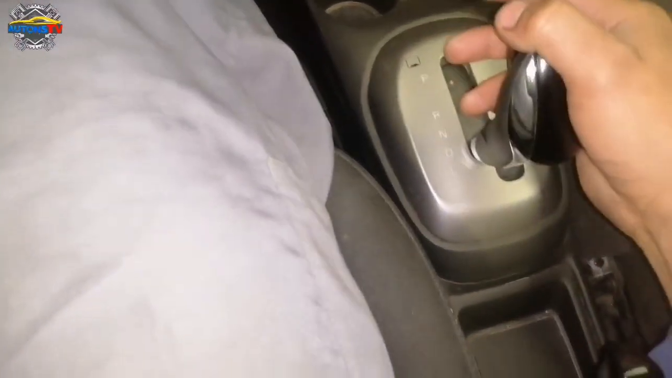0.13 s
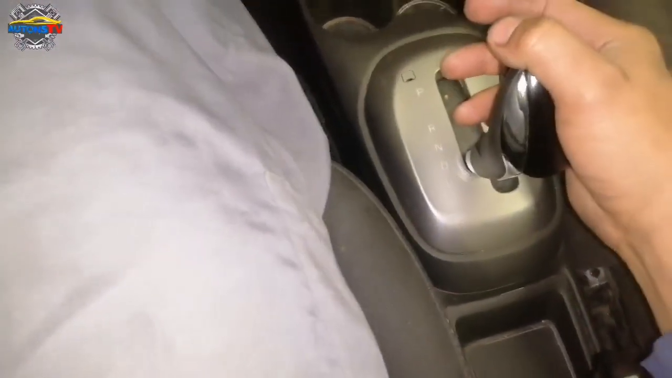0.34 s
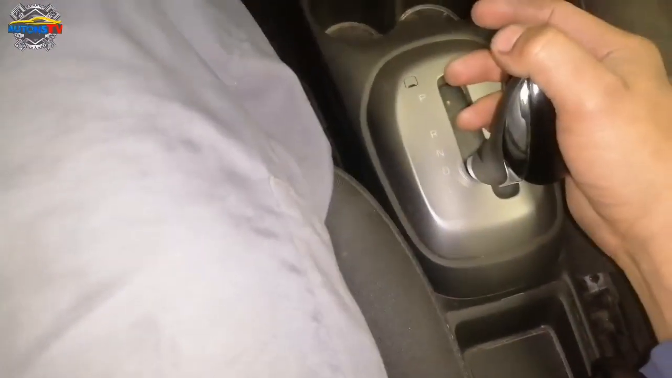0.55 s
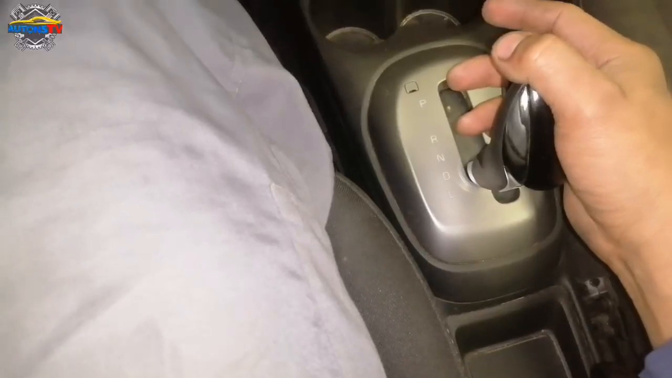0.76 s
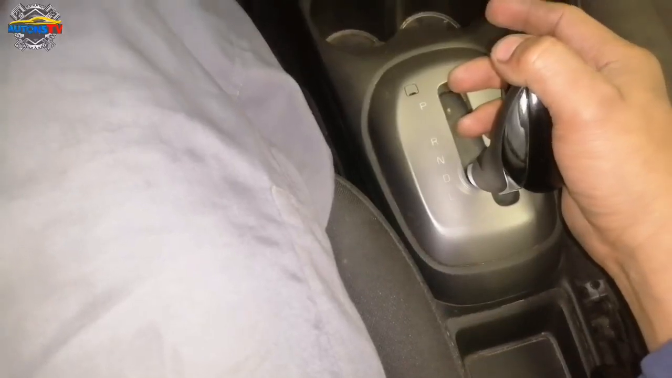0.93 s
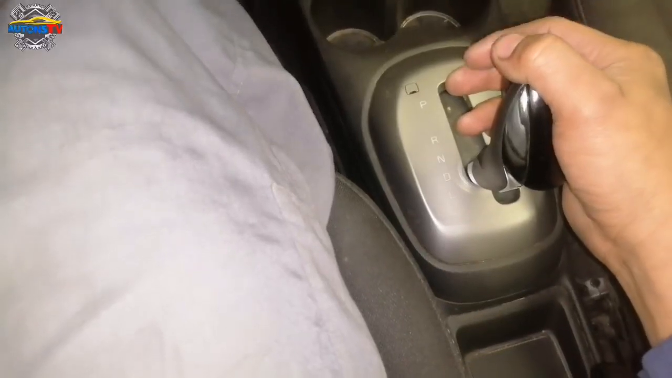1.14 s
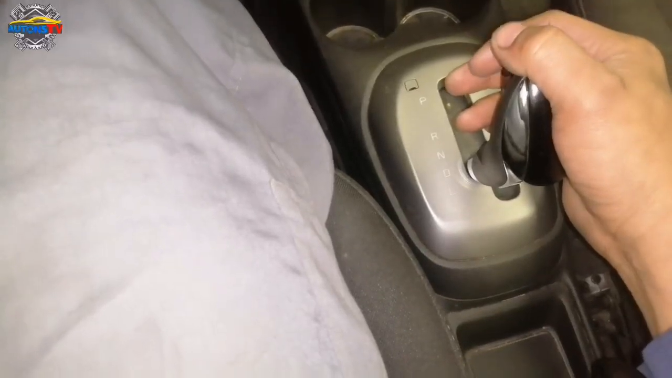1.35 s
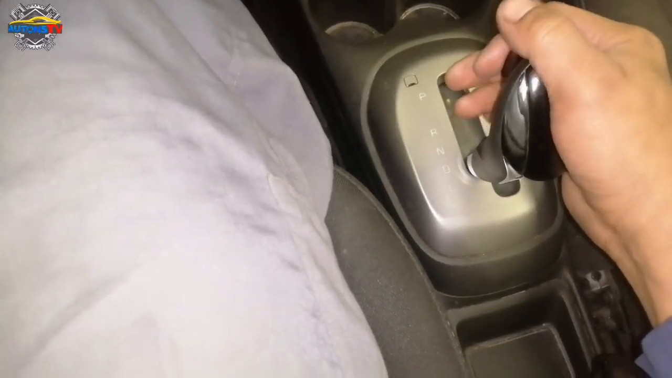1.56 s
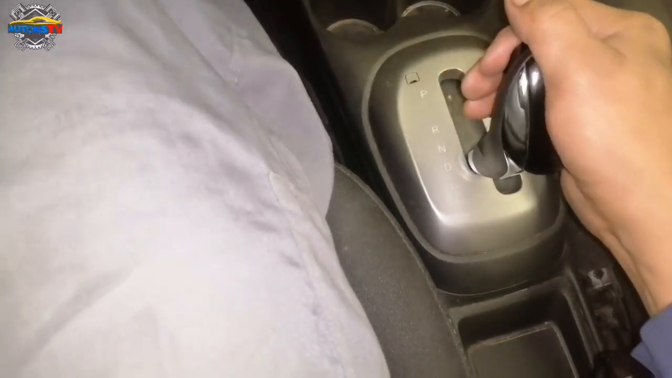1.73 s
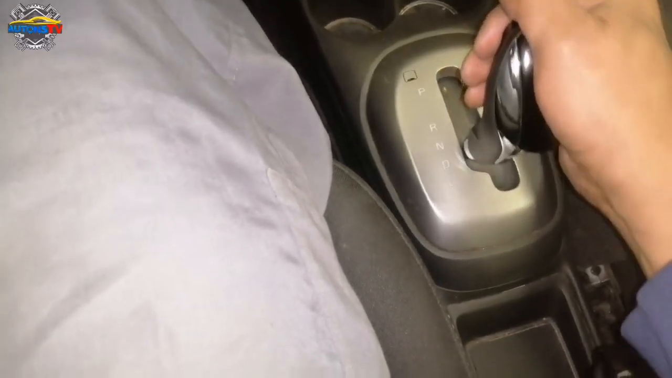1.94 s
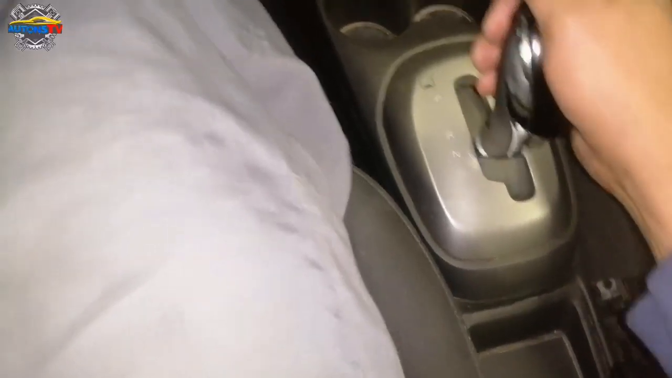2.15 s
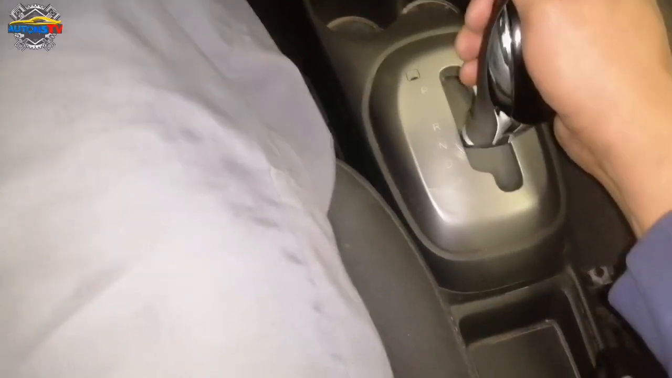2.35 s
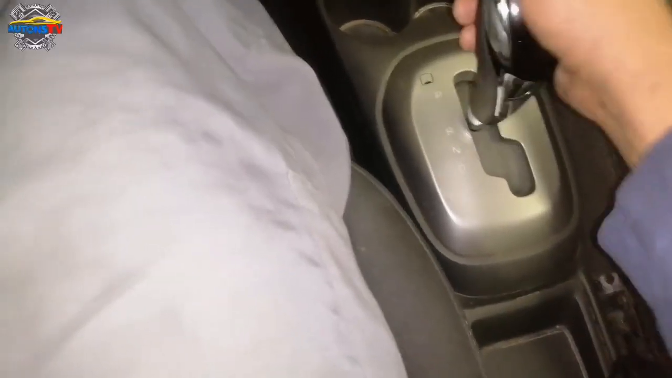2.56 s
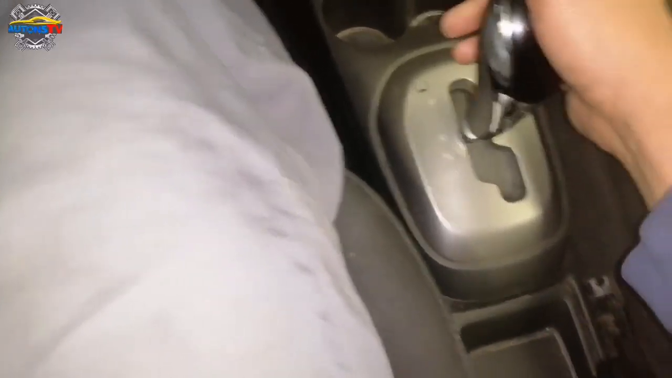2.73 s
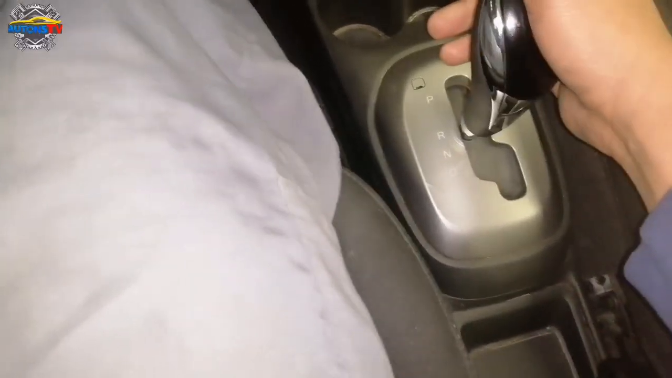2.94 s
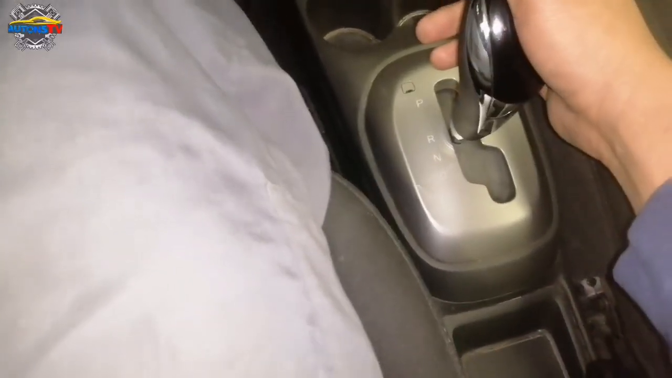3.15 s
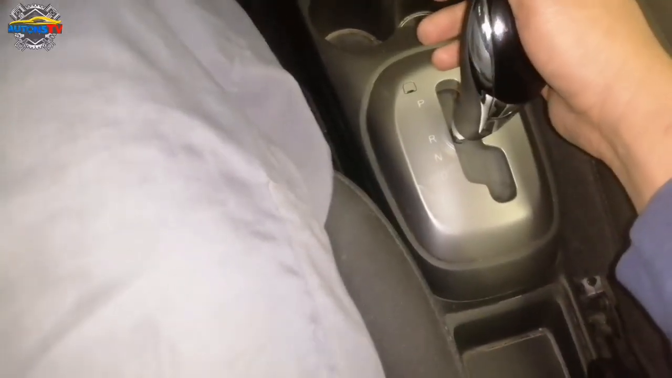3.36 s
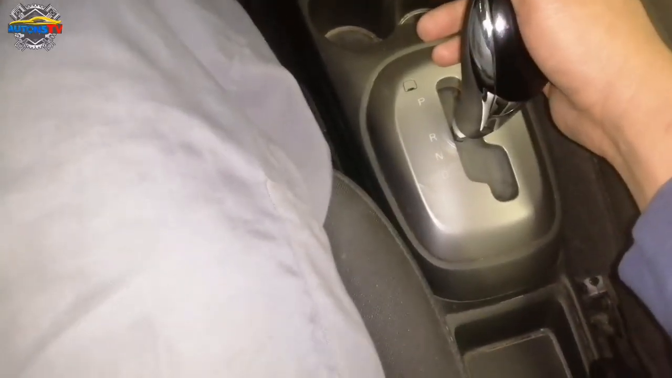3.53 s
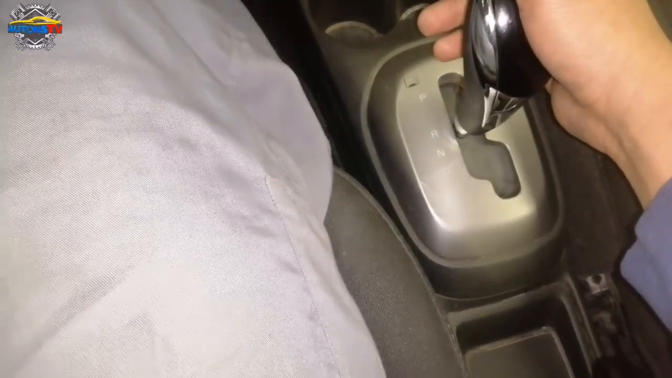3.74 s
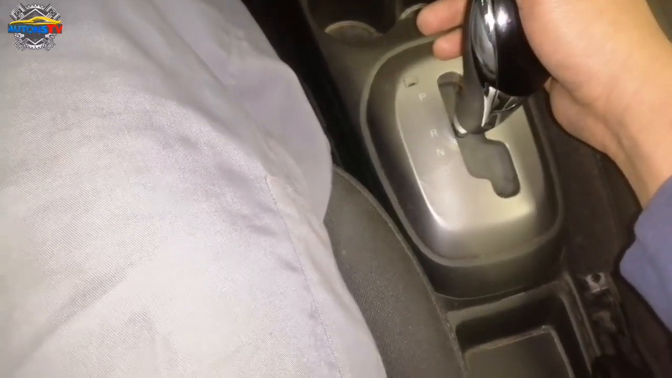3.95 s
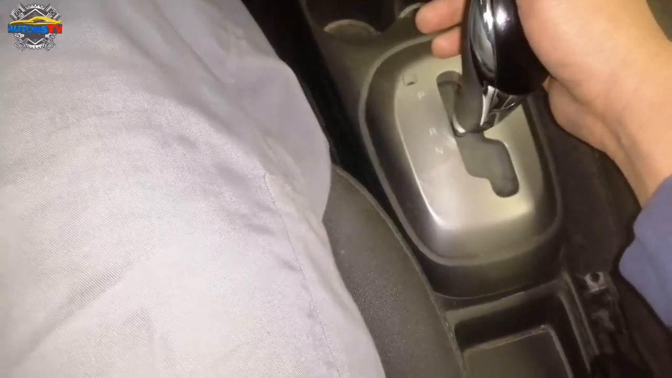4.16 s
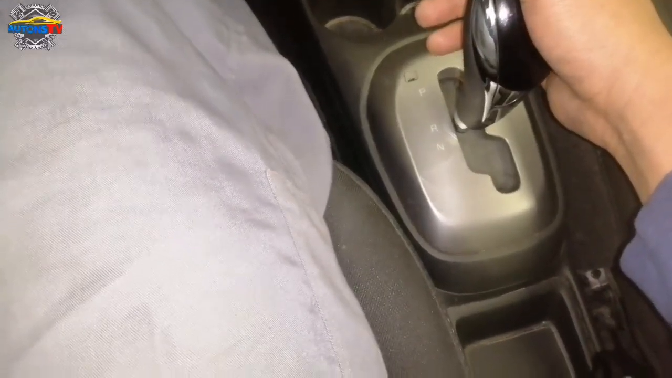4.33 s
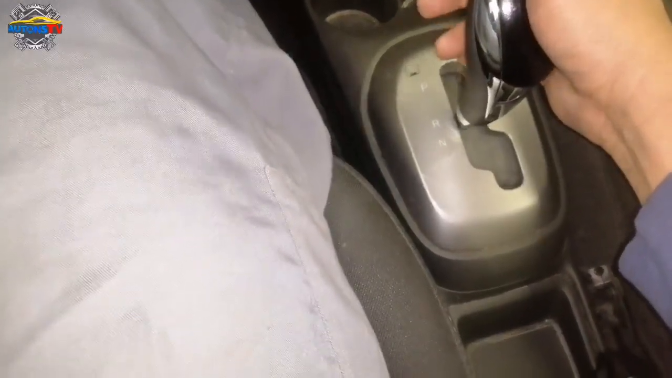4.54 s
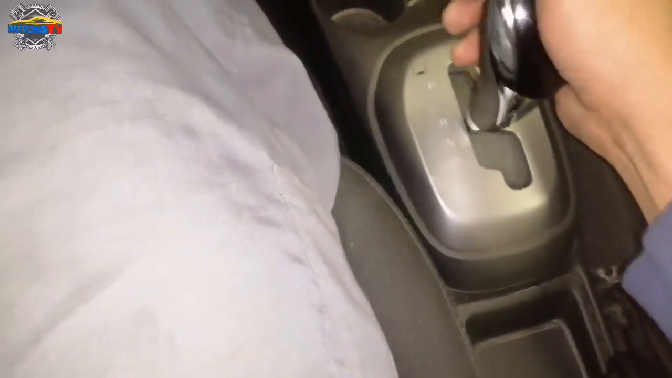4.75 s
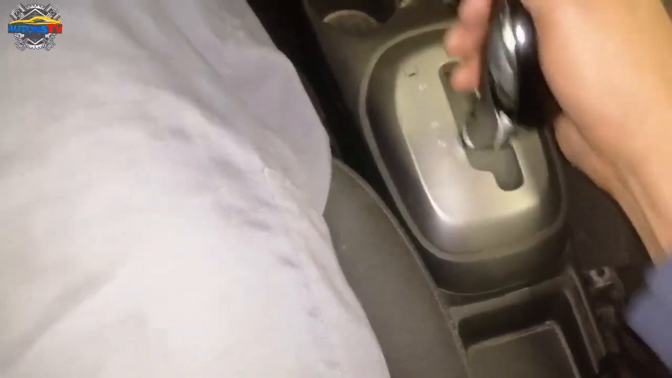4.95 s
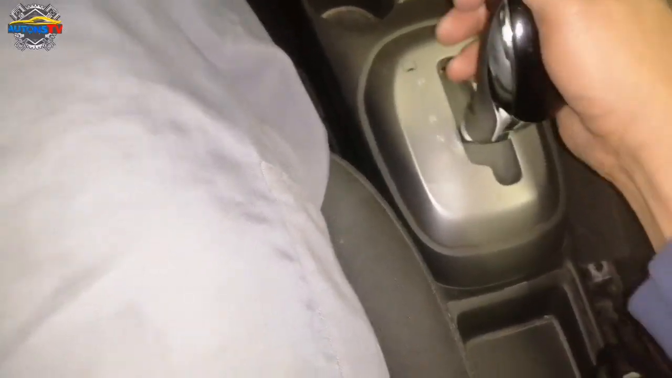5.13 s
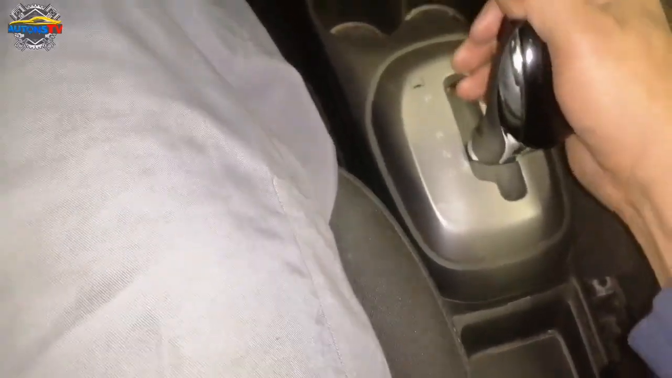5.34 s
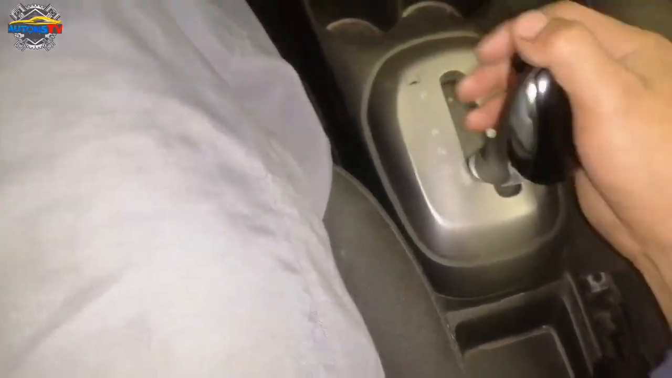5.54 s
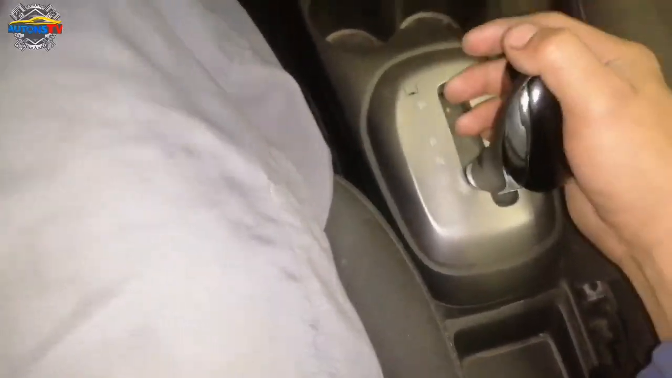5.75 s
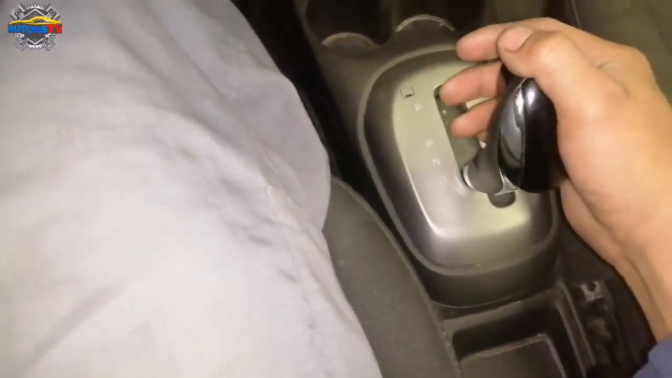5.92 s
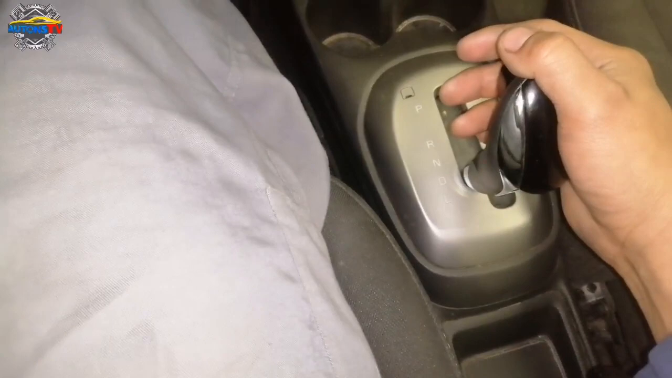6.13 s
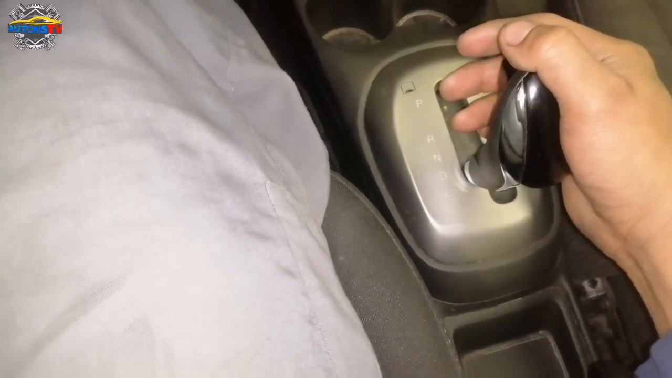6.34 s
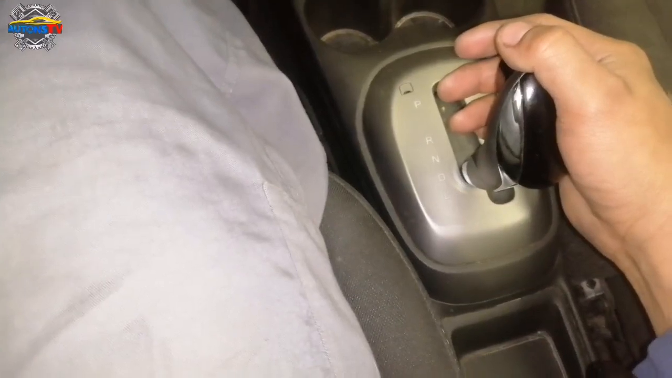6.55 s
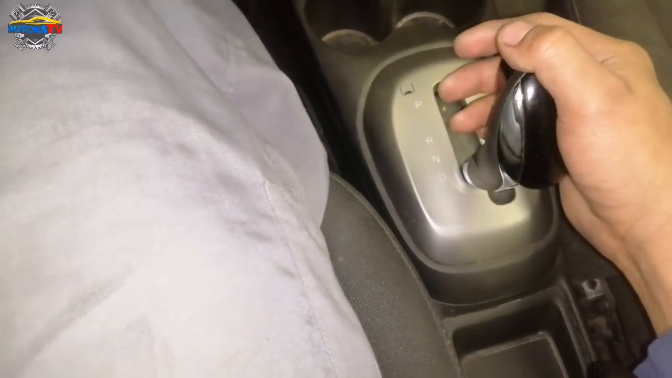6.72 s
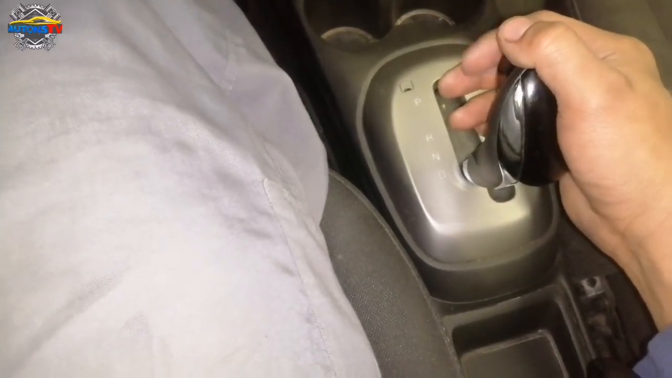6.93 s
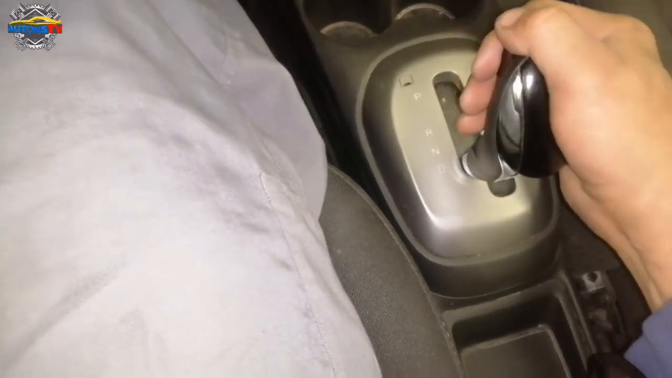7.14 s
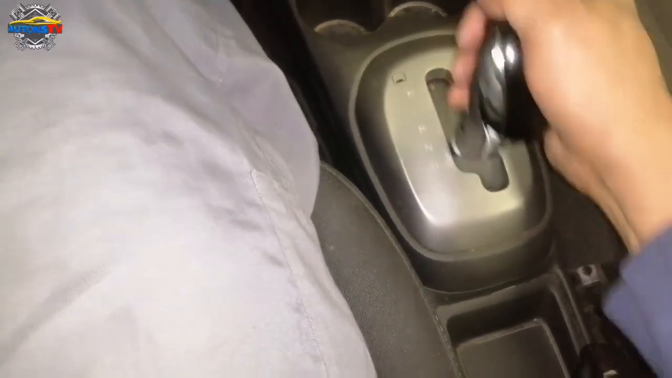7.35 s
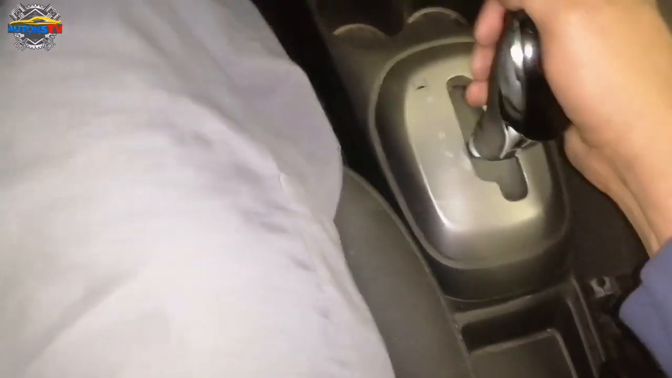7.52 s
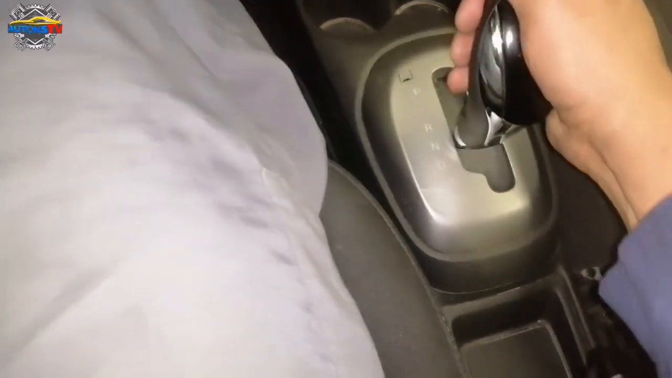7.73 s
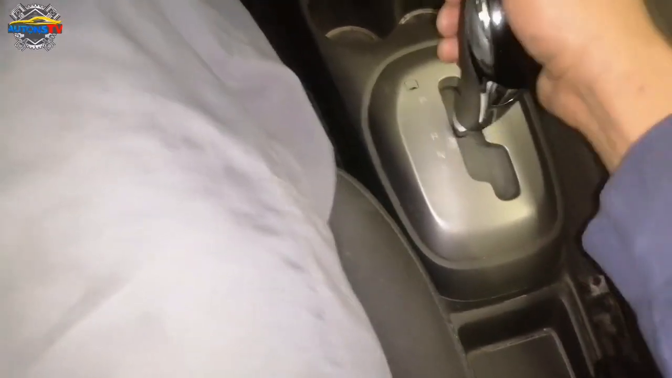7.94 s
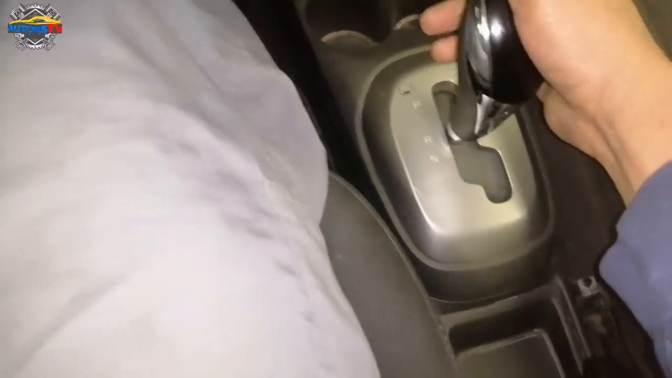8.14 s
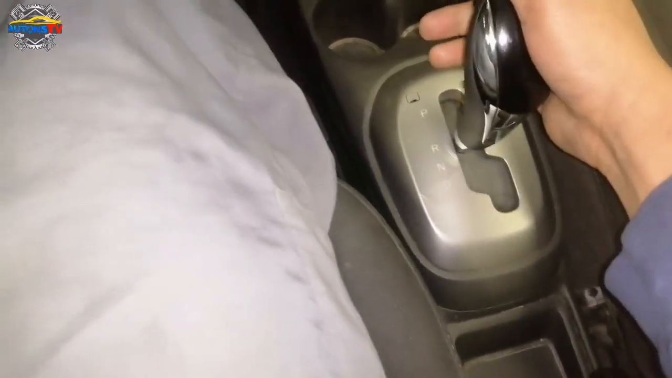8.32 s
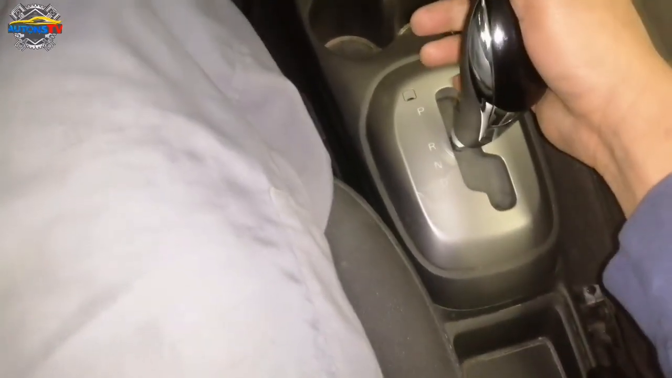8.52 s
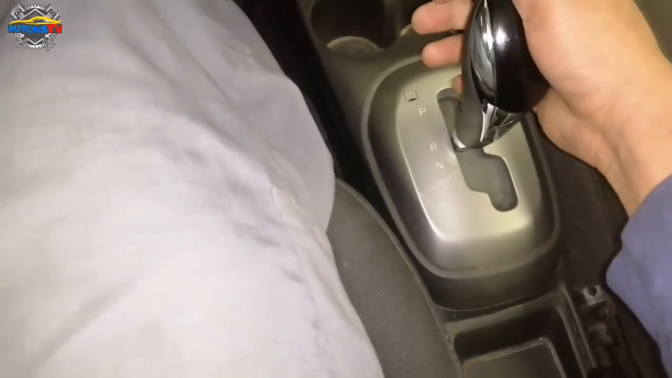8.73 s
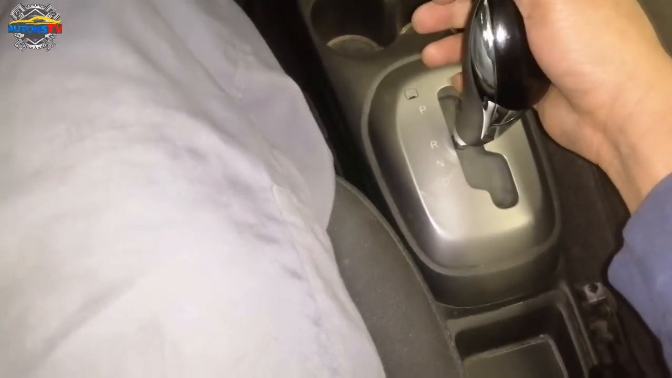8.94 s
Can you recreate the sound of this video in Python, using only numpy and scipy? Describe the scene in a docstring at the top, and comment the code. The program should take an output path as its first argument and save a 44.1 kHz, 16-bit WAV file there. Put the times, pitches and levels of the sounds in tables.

```python
"""Inside an idling car, a hand moves the automatic gear lever between drive and reverse.
The lever thuds into its notches, its plastic parts tick and rub, and its lock button snaps back.
The engine speeds up a little between gears, then hums and shakes the car as it pulls against one.
Gearbox shafts whine faintly, and air hisses through the brake booster as the pedal moves."""
import sys
import numpy as np
from scipy import signal
from scipy.fft import rfft, irfft, next_fast_len
from scipy.io import wavfile
from scipy.ndimage import map_coordinates

SR = 44100
rng = np.random.default_rng(int(sys.argv[2]) if len(sys.argv) > 2 else 0)


def digitize_waveform(pressure):
    """Quantize a signal to 16-bit integers and store it at the path in sys.argv[1].

    Rows of a 2-D input are taken as channels; values are limited to [-1, 1].
    """
    field = np.atleast_2d(pressure).T
    bounded = np.clip(field, -1, 1)
    quanta = np.round(bounded * 32767).astype(np.int16)
    wavfile.write(sys.argv[1], SR, quanta)


N = 400428

# Levels are relative, before each sound's own gain. ring_s is the time to fade by 60 dB.
# the lever lands in a notch: start_s, level_db, boom_db, knock_db, pitch_hz
LEVER_THUDS = [(0.058, -18, -13.5, -6.5, 255), (0.07, -37, -9, 5, 275), (2.135, -10, -9, -11, 277.5),
               (2.249, -32, -26, -15, 279), (2.448, -33.5, -9, -10.5, 265), (2.599, -11, -8, -8.5, 280.7),
               (2.684, -31.5, 5.5, -27.5, 296), (5.04, -15.5, -9, -12, 274.4),
               (5.076, -23.5, -9, -10.5, 271), (5.174, -27.5, -18, -17, 273), (5.56, -18, -8, -7.5, 260.5),
               (5.597, -29.5, -0.5, -15, 270), (5.619, -26.5, -6, -37, 276), (7.499, -11, -8, -13, 283),
               (7.602, -30.5, 0.5, -8, 277), (7.832, -31, -29, -15, 273), (7.994, -11.5, -6.5, -9.5, 281),
               (8.064, -29, -9, -16.5, 270), (8.136, -32, -3, -16, 275)]
# the lever's own tones: pitch_multiple, level_db, ring_s
LEVER_TONES = [(.9, -25, 0.047), (1, 1.4, 0.096), (1.091, -6.5, 0.09)]
# tones of the console panel and cabin air: pitch_hz, level_db, ring_s
CONSOLE_TONES = [(125.3, -1.5, 0.23), (184, -6, 0.1204), (341.3, -1.5, 0.15), (378, -0.5, 0.18),
                 (459, -6.5, 0.097), (490.5, -8.5, 0.062), (548.2, -6.5, 0.14), (834, -14.5, 0.18),
                 (1153, -19.5, 0.14)]
# trim shaken by a thud: pitch_hz, level_db
KNOCK_SPECTRUM = [(60, -9.5), (130, -11), (200, -27.5), (420, 0), (800, -10.5), (1500, -20), (4000, -55.5)]
# how long trim rings, before each clatter stretches it: pitch_hz, ring_s
TRIM_RING_TIMES = [(300, 0.092), (1200, 0.096), (4000, 0.079), (12000, 0.079)]
# the lock button springs out and bounces: start_s, level_db
BUTTON_SNAPS = [(2.7976, -14), (2.816, -19), (8.1850, -12.5), (8.2043, -20)]
# tones of the knob: pitch_hz, level_db, ring_s
KNOB_TONES = [(278, -3, 0.088), (347, -4.5, 0.069), (756, -21, 0.064), (914, -14, 0.09), (1020, -16, 0.086),
              (1380, -19.5, 0.11), (1685, -17, 0.067), (2355, -14, .075), (2713, -19.5, 0.046),
              (3245, -20, .075), (3530, -12.5, 0.0591), (3760, -8.5, 0.058), (3835, -14, 0.066),
              (4170, -11.5, 0.048), (4380, -11.5, 0.05), (5020, -22, 0.058), (5520, -22, .065),
              (5630, -15.5, 0.0551), (7240, -23, .06)]
# the button's crack and its bright edge: pitch_hz, level_db
CRACK_SPECTRUM = [(88, -44), (150, -20), (286, 2), (448, -12.5), (871, -8.5), (1390, -15), (1900, -20),
                  (2400, -17), (2600, -13.5), (3770, -17), (5570, -13.5), (6260, -25.5), (10000, -30.5),
                  (14200, -57.5), (16000, -69)]
EDGE_SPECTRUM = [(1000, -28.5), (4500, 7.5), (9500, -2), (15000, -28.5)]
# the lever's links touch: start_s, level_db, clack_db, edge_db
LINK_TICKS = [(0.054, -29.5, 0.5, -18.5), (1.5783, -55, -7, -12.5), (1.7165, -54, 3, -18),
              (1.8977, -49, -16, -8), (2.134, -32, -12, -18.5), (2.1507, -36, 2, -26),
              (2.2464, -46, 1, -16), (2.439, -49.5, 4.5, -23), (2.597, -35, 3, -11.5), (2.615, -32, 2, -28),
              (2.6822, -35.5, 10, -27), (2.7373, -52, 2, -17), (5.037, -32, 1.5, -21),
              (5.0453, -28.5, -15, -27), (5.0716, -41.5, 2, -15), (5.1547, -43.5, 4, -22),
              (5.3285, -57, -1.5, -27), (5.5583, -32, 3, -18), (5.6113, -57, 8, -2), (7.105, -58, -7, -9),
              (7.19, -56.5, -1, -8), (7.4306, -46.5, -11, -10.5), (7.5009, -30.5, 6.5, -26),
              (7.5151, -37, 3, -21), (7.6014, -42.5, -3, -17), (7.8268, -52.5, 3.5, -15),
              (7.9903, -33.5, -6, -15.5), (8.014, -33.5, -8, -29), (8.0614, -29.5, 3, -22),
              (8.1324, -40.5, -4, -17.5)]
# struck plastic: pitch_hz, level_db
PLASTIC_SPECTRUM = [(300, -20), (500, -1.5), (680, -24), (850, -3.5), (1200, -13), (1420, -6), (1750, -14),
                    (2380, -17), (2600, -19), (2880, -16.5), (3400, -23.5), (4400, -25), (7700, -29.5),
                    (15000, -43.5)]
# resonances of the plastic housing: pitch_hz, width_hz, boost_db
HOUSING_PEAKS = [(1650, 60, 1.5), (2370, 87, 1), (2720, 34, 0.5), (3020, 66, 5.5), (3503, 41, 5),
                 (3940, 70, 7.5), (4470, 61, 4.5), (5600, 78, 11.5), (7500, 180, 5.5)]
# the lever taps its gate, the slotted plate that guides it: start_s, level_db
GATE_TAPS = [(0.0535, -24.5), (0.0946, -32.5), (2.683, -24.5), (5.1767, -50), (5.558, -26), (5.6146, -44.5),
             (8.0635, -22)]
# tones of that hollow plate: pitch_hz, level_db, ring_s
GATE_TONES = [(480, -5.5, 0.096), (900, -31, .06), (1048, -6.5, 0.053), (1267, 2.5, 0.029),
              (1363, 1, 0.046), (1610, -21, .04)]
# a spring in the links pings: start_s, level_db, pitch_hz, ring_s
SPRING_PINGS = [(1.7165, -53, 1850, 0.03), (7.107, -56.5, 3090, 0.043), (7.109, -57, 3200, 0.054)]
# the lever rubs along its gate: crest_s, rise_s, fall_s, groan_db, scrape_db
GATE_RUBS = [(.06, 0.043, 0.064, -38, -60.5), (2.135, 0.01, 0.035, -31.5, -53.5),
             (2.6, 0.022, .06, -30, -61), (2.795, 0.016, 0.017, -36.5, -69), (4.88, 0.094, 0.051, -49, -83),
             (5.13, 0.046, 0.11, -55, -74), (5.562, 0.026, 0.043, -43, -56.5), (7.5, .015, .03, -29, -51),
             (7.99, 0.083, 0.13, -40.5, -66.5), (8.18, .02, 0.055, -41.5, -69)]
# the groaning console and the scraped plastic: pitch_hz, level_db
GROAN_SPECTRUM = [(60, -22.5), (195, -19.5), (275, 6.5), (330, -3.5), (400, -8), (560, -15), (900, -16.5),
                  (1600, -30.5), (4000, -74)]
SCRAPE_SPECTRUM = [(400, -25.5), (1000, 0), (2800, 2.5), (5500, -8.5), (10000, -17.5), (15500, -29)]
# the freed engine speeds up between gears: crest_s, firing_hz
ENGINE_FLARES = [(.7, 25.52), (3.32, 25.71), (6.15, 25.45), (8.73, 25.8)]
# the car body booms when the firings reach its resonance: firing_hz, level_db
BODY_BOOM = [(22.3, -44), (23.2, -52), (24.2, -49.5), (25.5, -34.5)]
# the engine pulls against each gear: start_s, end_s, load_db
DRIVE_PULLS = [(1.0, 2.7, -55.5), (6.44, 8.0, -52)]
REVERSE_PULLS = [(0, 0.26, -46.5), (3.64, 5.5, -47.5), (8.96, 9.5, -46.5)]
# the engine's overtones in each gear: firing_multiple, level_db
DRIVE_TONES = [(2, 5.5), (3, 3), (4, -11.5), (5, 1.5), (6, -2.5), (7, -23.5), (9, -24)]
REVERSE_TONES = [(2, -3), (3, 1.5), (4, -0.5), (5, -7.5), (6, 1), (8, -12), (9, -14), (10, -20.5),
                 (11, -17.5), (13, -15)]
# engine noise in the cabin: pitch_hz, level_db
MURMUR_SPECTRUM = [(25, -2), (60, -2.5), (120, -7), (200, -8.5), (320, -12), (500, -17), (900, -25),
                   (1200, -27.5), (1700, -33), (4000, -38.5), (7500, -46), (8600, -52.5), (12000, -56.5),
                   (15500, -59.5)]
# resonances of the cabin: pitch_hz, width_hz, boost_db
CABIN_PEAKS = [(300.6, 27.8, 9), (689, 24, 8), (1098, 82, 4.5)]
# the car jolts as reverse grips: crest_s, level_db
REVERSE_JOLTS = [(3.72, -35), (9.05, -43)]
# the car body's rumble: pitch_hz, level_db
RUMBLE_SPECTRUM = [(30, -27), (65, -2), (90, -1.5), (135, -3.5), (165, -8), (230, -22.5), (500, -52),
                   (2000, -100)]
# gearbox shafts change speed: start_s, length_s, start_hz, end_hz, level_db
SHAFT_WHINES = [(0.362, 0.12, 139, 247, -55.5), (0.766, 0.092, 171, 90, -60), (0.876, 0.098, 304, 90, -51),
                (7.53, .13, 258, 118, -44), (7.661, 0.14, 61, 52, -42.5), (7.818, 0.12, 393, 417, -50),
                (8.07, 0.088, 463, 526, -52), (8.312, 0.18, 239.6, 272, -52)]
# the brake pedal is pressed and let go: down_s, up_s, intake_db, release_db
PEDAL_PRESSES = [(0, 0.022, -57, -60.5), (0.411, 0.61, -60.5, -59), (0.99, 1.27, -64, -62.5),
                 (1.89, 2.322, -69, -61.5), (3.53, 3.8, -71, -88)]
# air entering and leaving the brake booster: pitch_hz, level_db
INTAKE_SPECTRUM = [(800, -6), (1600, -1.5), (3000, -1.5), (4600, -4.5), (6000, -10), (7800, -13),
                   (9400, -12), (11500, -19), (13500, -30), (16000, -44)]
RELEASE_SPECTRUM = [(800, -24), (2000, -9.5), (3600, 1), (4400, -10.5), (5200, -6), (6700, -24),
                    (7600, -18), (10000, -29), (11500, -32), (16000, -54)]
# resonances of the booster's air path: pitch_hz, width_hz, boost_db
VALVE_PEAKS = [(2470, 60, 3), (2790, 99, 3.5), (3700, 130, 4.5), (4550, 130, 7.5), (5720, 70, 10),
               (6760, 105, 15), (9800, 130, 4), (10900, 200, 4.5)]

IDLE_HZ = 22.35  # engine firings a second at rest
TOP_HZ = 15400


def lever_thuds():
    """The lever hits a cushioned stop, so it and the console start ringing softly, then fade."""
    lead_s = .004  # the cushion starts to give just before the stop
    out, t = np.zeros(N), np.arange(SR // 3) / SR - lead_s
    cushion = (1 + np.tanh((t - .0022) / .0021)) / 2
    for start, db, boom_db, knock_db, lever_hz in LEVER_THUDS:
        lever = [(k * lever_hz, level, ring_s) for k, level, ring_s in LEVER_TONES]
        console = [(hz, level - 5 + (boom_db if hz < lever_hz else knock_db), ring_s)
                   for hz, level, ring_s in CONSOLE_TONES]
        trim = clatter(lambda hz: along(KNOCK_SPECTRUM, hz), stretch=1.56, attack_s=.0013)
        add(out, start - lead_s, amp(db + 1) * cushion * ringing(lever + console, t, scatter_db=0))
        add(out, start, amp(db + knock_db - 7) * trim)
    return out


def button_snaps():
    """A spring slides the lock button into its stop: a bright crack, and the knob rings."""
    out, t = np.zeros(N), np.arange(SR // 4) / SR
    crack = lambda hz: along(CRACK_SPECTRUM, hz) - 10 * np.log10(1 + (400 / (hz + 1)) ** 4)
    for start, db in BUTTON_SNAPS:
        ring = sum(amp(level + rng.normal(0, 1.5) - 60 * t / ring_s)
                   * np.sin(2 * np.pi * hz * t + rng.uniform(0, 2 * np.pi))
                   for hz, level, ring_s in KNOB_TONES)
        edge = clatter(lambda hz: along(EDGE_SPECTRUM, hz), stretch=.3, attack_s=.00048)
        slide = clatter(crack, stretch=.44, attack_s=.0022)
        strike = clatter(crack, stretch=.61, attack_s=.0015)
        add(out, start - .005, amp(db - 32) * slide)
        add(out, start, amp(db - 3) * strike + amp(db - 12) * edge)
        add(out, start, amp(db - 4) * ring * (1 - np.exp(-t / .0019)))
    return out


def link_ticks():
    """Each contact rings the plastic in three bands: a low clack, a middle tick and a high edge."""
    out = np.zeros(N)
    for start, db, clack_db, edge_db in LINK_TICKS:
        bands = [(566, 1250, clack_db - 3.5, .6), (1770, 4920, -6, .92), (5870, 17000, edge_db - 3, .78)]
        for low_hz, high_hz, band_db, stretch in bands:
            cut_db = lambda hz: 10 * np.log10(1 + (low_hz / (hz + 1)) ** 12 + (hz / high_hz) ** 12)
            band = lambda hz: along(PLASTIC_SPECTRUM, hz) + humps(HOUSING_PEAKS, hz) - cut_db(hz)
            add(out, start, amp(db + band_db) * clatter(band, stretch, attack_s=.00087))
    return out


def gate_taps():
    """Sideways taps ring the hollow gate plate; now and then a spring pings."""
    out, t = np.zeros(N), np.arange(SR // 5) / SR
    for start, db in GATE_TAPS:
        add(out, start, amp(db - 9) * ringing(GATE_TONES, t, scatter_db=2))
    for start, db, hz, ring_s in SPRING_PINGS:
        add(out, start, ringing([(hz, db, ring_s)], t, scatter_db=2.5))
    return out


def gate_rubs():
    """Uneven friction in the gate makes the console groan and scrapes the plastic."""
    groan = sum(amp(db) * swell(crest, rise, fall) for crest, rise, fall, db, _ in GATE_RUBS)
    scrape = sum(amp(db) * swell(crest, rise, fall) for crest, rise, fall, _, db in GATE_RUBS)
    grip_db = 2.4 * wobble(70)
    groan *= amp(grip_db - 5) * noise(lambda hz: along(GROAN_SPECTRUM, hz), N)
    scrape *= amp(grip_db + 2.5) * noise(lambda hz: along(SCRAPE_SPECTRUM, hz), N)
    return groan + scrape


def engine():
    """The firings shake the car into a hum; each gear loads the engine and brings its own overtones."""
    firing_hz = IDLE_HZ + sum((hz - IDLE_HZ) * swell(crest, rise_s=.24, fall_s=.16)
                              for crest, hz in ENGINE_FLARES)
    phase = 2 * np.pi * np.cumsum(firing_hz) / SR
    drive_load = np.hypot(load(DRIVE_PULLS), amp(-60))  # a faint hum stays even with no load
    reverse_load = load(REVERSE_PULLS)
    boom = np.hypot(amp(along(BODY_BOOM, firing_hz)), amp(1) * reverse_load)
    hum = boom * amp(1.26 * wobble(3.036)) * np.sin(phase)
    drive_db, reverse_db = dict(DRIVE_TONES), dict(REVERSE_TONES)
    for k in sorted({*drive_db, *reverse_db}):
        drive = drive_load * amp(drive_db.get(k, -np.inf))
        reverse = reverse_load * amp(reverse_db.get(k, -np.inf))
        # the overtones stay nearly in step, so each firing is a soft beat
        hum += np.hypot(drive, reverse) * amp(.5 * wobble(5)) * np.sin(k * phase + rng.normal(0, .7))
    # machine noise comes into the cabin, pulsing with the firings
    murmur = noise(lambda hz: along(MURMUR_SPECTRUM, hz) + humps(CABIN_PEAKS, hz), N)
    return np.sqrt(2) * hum + amp(-51.5) * murmur * (1 + .092 * np.sin(phase))


def body_shudder():
    """The car jolts as reverse grips, then shakes for as long as the engine pulls."""
    jolts = sum(amp(db) * swell(crest, rise_s=.065, fall_s=.11) for crest, db in REVERSE_JOLTS)
    shake = amp(-5) * load(REVERSE_PULLS)
    return (jolts + shake) * noise(lambda hz: along(RUMBLE_SPECTRUM, hz), N)


def gearbox_whines():
    """Shafts speed up or slow down as the clutches swap over, making brief gliding tones."""
    out = np.zeros(N)
    for start, length_s, start_hz, end_hz, db in SHAFT_WHINES:
        progress = np.linspace(0, 1, round(length_s * SR))
        phase = 2 * np.pi * np.cumsum(start_hz + (end_hz - start_hz) * progress) / SR
        add(out, start, amp(db + 2.5) * np.sin(np.pi * progress) * np.sin(phase))
    return out


def brake_hiss():
    """Air hisses into the brake booster while the pedal is down and sighs out as it rises."""
    intake = sum(amp(db) * held(down, up, rise_s=.049, fall_s=.07) for down, up, db, _ in PEDAL_PRESSES)
    release = sum(amp(db) * swell(up, rise_s=.096, fall_s=.09) for _, up, _, db in PEDAL_PRESSES)
    air = lambda spectrum: noise(lambda hz: along(spectrum, hz) + humps(VALVE_PEAKS, hz), N)
    return (intake * air(INTAKE_SPECTRUM) + release * air(RELEASE_SPECTRUM)) * amp(.8 * wobble(30))


def clatter(spectrum, stretch, attack_s):
    """Plastic trim rings as a burst of fading noise; a larger stretch rings longer."""
    size = SR // 4
    hz, t, bands = signal.stft(noise(spectrum, size), SR, nperseg=128)
    ring_s = stretch * along(TRIM_RING_TIMES, hz)
    ring = signal.istft(bands * amp(-60 * t / ring_s[:, None]), SR, nperseg=128)[1][:size]
    return ring * (1 - np.exp(-np.arange(size) / SR / attack_s))


def ringing(tones, t, scatter_db):
    """Fading sine waves, their levels varied at random by scatter_db."""
    return sum(amp(db + rng.normal(0, scatter_db) - 60 * t / ring_s) * np.sin(2 * np.pi * hz * t)
               for hz, db, ring_s in tones)


def load(pulls):
    """How hard the engine pulls as a clutch grips and lets go, as a gain."""
    return sum(amp(db) * held(start, end, rise_s=.11, fall_s=.26) for start, end, db in pulls)


def swell(crest_s, rise_s, fall_s):
    """A hump of height 1 with its top at crest_s."""
    t = np.arange(N) / SR - crest_s
    return np.exp(-np.abs(t / np.where(t < 0, rise_s, fall_s)) ** 1.386)  # power 1 is pointed, 2 round


def held(start_s, end_s, rise_s, fall_s):
    """A gain of up to 1 from start to end, with soft edges."""
    t = np.arange(N) / SR
    return (1 + np.tanh((t - start_s) / rise_s)) / 2 * (1 - np.tanh((t - end_s) / fall_s)) / 2


def wobble(rate):
    """A smooth curve through rate random points a second."""
    return map_coordinates(rng.standard_normal(int(N * rate / SR) + 4), [np.arange(N) * rate / SR])


def noise(spectrum, size):
    """Noise shaped by spectrum(hz) in dB, then scaled to an average power of 1."""
    x = filtered(rng.standard_normal(size), lambda hz: amp(spectrum(hz)))
    return x / np.sqrt(np.mean(x ** 2) + 1e-20)


def filtered(x, gain):
    """Scale each frequency in x by gain(hz)."""
    size = next_fast_len(len(x) + 8192)
    return irfft(rfft(x, size) * gain(np.fft.rfftfreq(size, 1 / SR)), size)[:len(x)]


def along(points, hz):
    """Read between (pitch_hz, value) points on a log scale."""
    pitches, values = np.transpose(points)
    return np.interp(np.log(hz + 1), np.log(pitches + 1), values)


def humps(peaks, hz):
    """The boost in dB from a set of resonances."""
    return sum(db / (1 + ((hz - centre) / width) ** 2) for centre, width, db in peaks)


def amp(db):
    """Decibels to gain."""
    return 10 ** (np.asarray(db) / 20)


def add(track, start_s, sound):
    """Mix a sound into the track."""
    part = track[max(round(start_s * SR), 0):][:len(sound)]
    part += sound[:len(part)]


def scene():
    """Lever, engine, gearbox and brake, heard in one channel above the console."""
    lever = lever_thuds() + link_ticks() + gate_taps() + button_snaps() + gate_rubs()
    return (lever + engine() + body_shudder() + gearbox_whines() + brake_hiss())[None]


def record(dry):
    """Cut off all treble above TOP_HZ."""
    return filtered(dry[0], lambda hz: hz < TOP_HZ)[None]


dry = scene()
out = record(dry)
digitize_waveform(out)
```